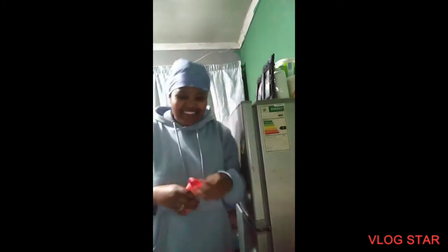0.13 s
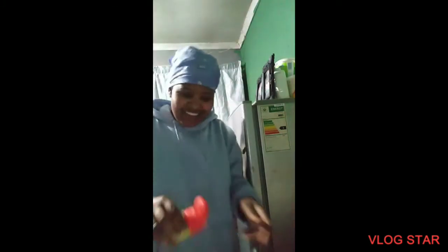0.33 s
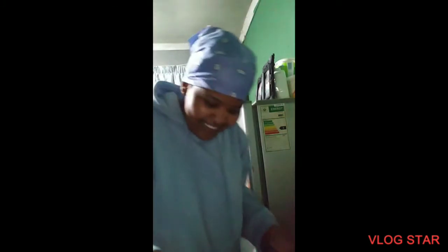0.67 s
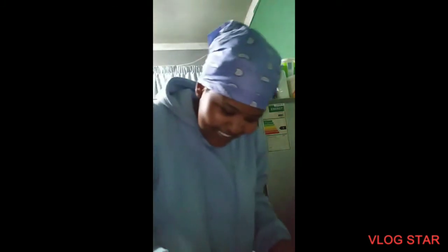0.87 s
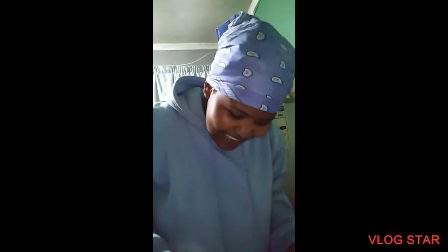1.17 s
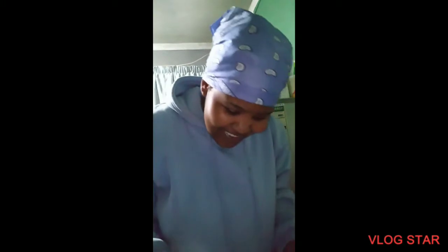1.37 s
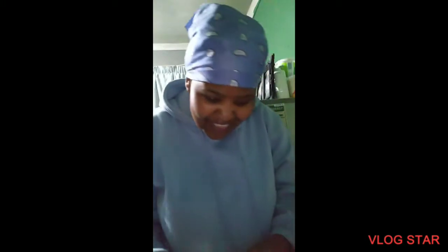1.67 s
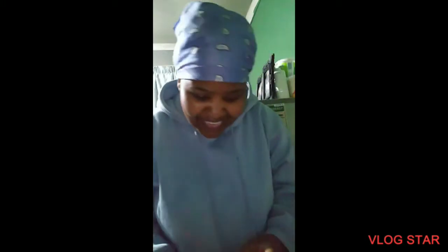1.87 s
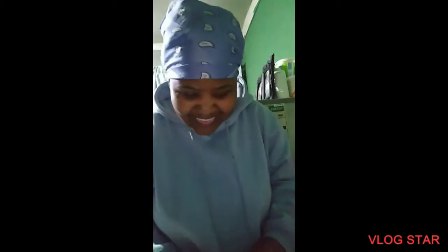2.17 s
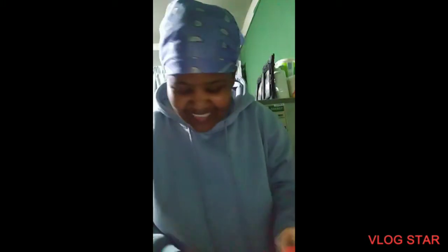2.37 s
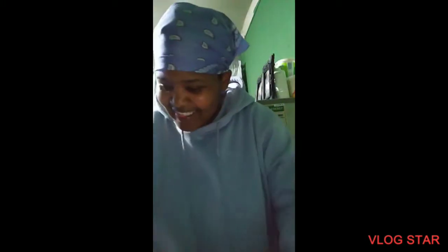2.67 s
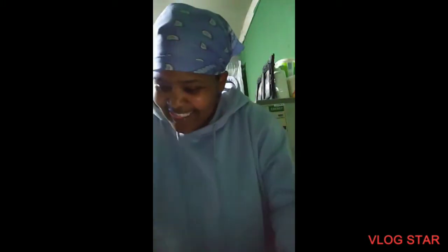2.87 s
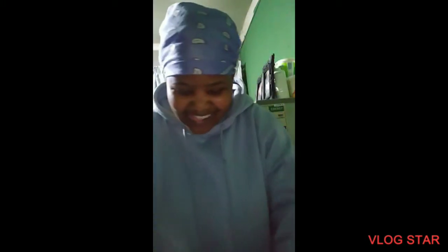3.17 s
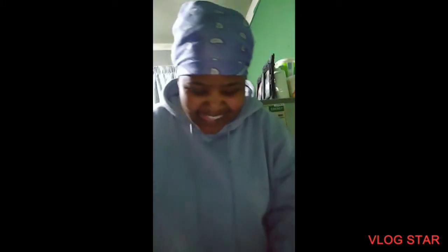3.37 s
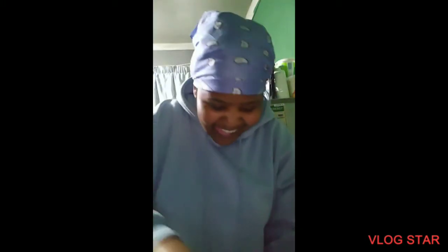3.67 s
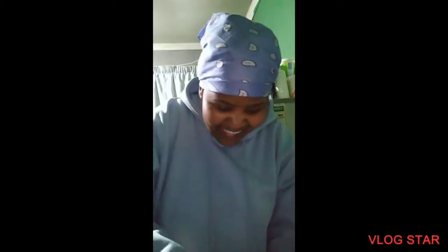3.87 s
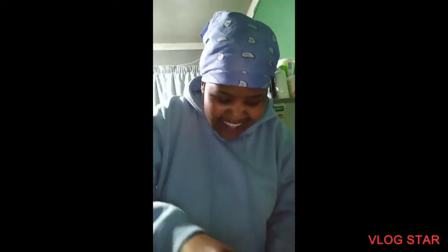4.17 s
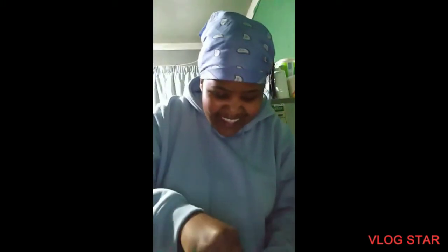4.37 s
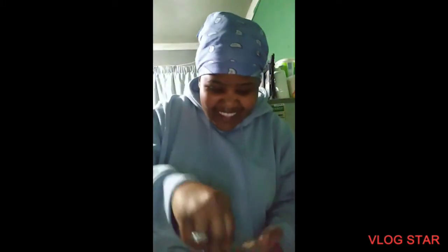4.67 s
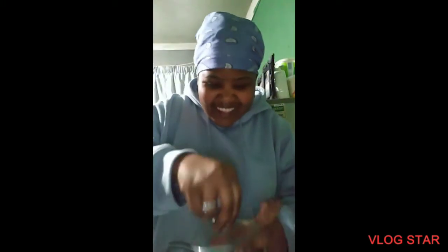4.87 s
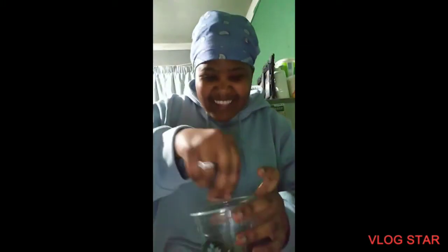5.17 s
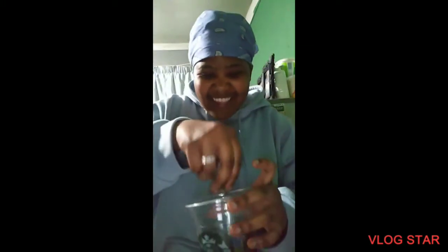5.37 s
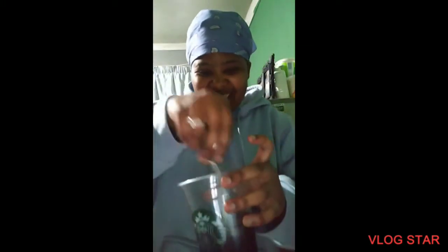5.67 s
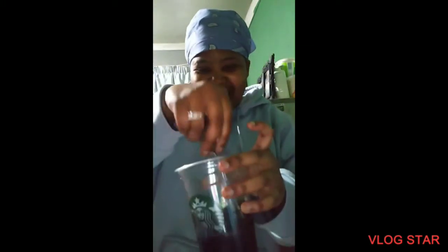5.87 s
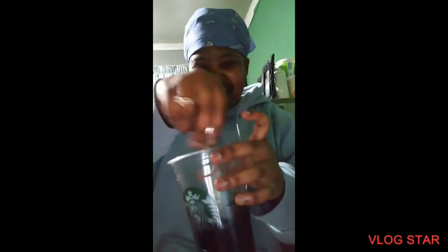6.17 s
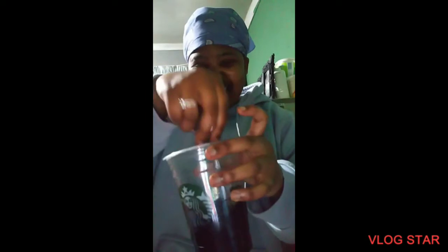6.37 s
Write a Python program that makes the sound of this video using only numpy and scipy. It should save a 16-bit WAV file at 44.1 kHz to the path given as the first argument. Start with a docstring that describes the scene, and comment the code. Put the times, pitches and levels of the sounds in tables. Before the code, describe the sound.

Brief crackly rustling of a packet and light sliding lead to two sharp knocks as things land on a kitchen counter. After a short lull, a spoon starts circling in a thin plastic cup, with quick, uneven taps and scrapes that seem to come nearer. The nearby microphones give a crisp stereo sound, with little echo and only faint room noise behind it.

```python
"""In a small kitchen, hands crumple a packet, slide things over the counter and set two down hard.
Then a spoon stirs a drink in a thin plastic cup, scraping and clattering on its wall, ever closer.
Rubbing is thousands of tiny slips; a hit is a burst of noise plus the ringing of the thing struck.
Two spaced microphones with bright treble pick it up over a faint fridge hum and background noise."""
import sys
import numpy as np
from scipy import signal
from scipy.fft import rfft, irfft, next_fast_len
from scipy.io import wavfile
from scipy.ndimage import uniform_filter1d

SR = 44100
rng = np.random.default_rng(int(sys.argv[2]) if len(sys.argv) > 2 else 0)


def materialize(psi):
    """Save the field psi as 16-bit PCM at rate SR to the path in sys.argv[1].

    A 1-D psi becomes a single channel; in a 2-D psi each row is a channel.
    """
    bounded = np.clip(np.atleast_2d(psi).T, -1, 1)
    quanta = np.round(bounded * 32767).astype(np.int16)
    wavfile.write(sys.argv[1], SR, quanta)


N = 287091

# Rustles, slides and the hiss that trails a knock.
# A rise or fall spans 30 dB; "middle" is the hiss below the treble.
# (peak time [s], rise [s], fall [s], hiss [dB], ringing [dB], middle against treble [dB])
HANDLING = [(0.0, .01, 0.31, -42.5, -45, -5), (.256, 0.04, 0.095, -45, -70, -10.5),
            (.385, 0.032, 0.12, -35.5, -45, -14), (.47, 0.15, 0.25, -54.5, -56, -5.5),
            (.63, 0.14, 0.21, -40, -76, -15.5), (.72, 0.11, 0.27, -32.5, -80, -12),
            (.817, 0.049, 0.095, -37, -39, -16), (.927, 0.17, 0.074, -36.5, -49, -14),
            (1.035, 0.19, 0.13, -39, -58, -19.5), (1.275, 0.0058, .13, -50.5, -79, -8),
            (1.6, 0.059, 0.16, -59.5, -78.5, -30), (1.68, 0.17, 0.18, -35, -92, -35),
            (1.75, 0.22, .11, -41.5, -82.5, -16.5), (2.13, 0.044, 0.083, -23, -37, -13),
            (2.2, .05, 0.2, -48, -53, -11.5), (2.37, 0.018, 0.17, -49.5, -85, -25.5),
            (2.41, 0.066, 0.037, -43, -81, -23.5), (2.574, 0.15, 0.4, -51.5, -78.5, -23),
            (2.73, 0.053, 0.41, -54.5, -88, -28), (2.94, 0.095, 0.11, -50, -61.5, -9.5),
            (3.0, 0.042, .2, -50.5, -35.5, 0.5), (3.1, 0.17, 0.25, -57, -36.5, 0),
            (3.202, 0.12, 0.24, -51, -48, -4.5), (3.81, 0.022, .2, -52.5, -85.5, -16),
            (3.855, 0.087, 0.084, -56, -66, -18.5)]
# Creases snapping. A fade is the time to die away by 60 dB.
# (time [s], treble crack [dB], middle crack [dB], ringing [dB], pitch [Hz], crack fade [s])
SNAPS = [(.2522, -43, -53, -58, 203, 0.073), (.3514, -68, -51, -39.5, 353, .038),
         (.3706, -37.5, -65, -31.5, 640, 0.24), (.428, -36, -62, -30, 382, 0.015),
         (.5885, -52, -43, -63, 960, 0.027), (.6085, -24, -33, -47.5, 810, 0.035),
         (.618, -9.5, -28, -43, 810, 0.012), (.697, -45, -34, -40, 875, 0.015),
         (.7106, -17, -31.5, -36, 884, 0.04), (.7975, -50, -43, -55, 286, .032),
         (.9134, -23, -46, -39, 486, 0.055), (.9198, -41, -31, -26.5, 560, 0.029),
         (1.278, -50.5, -55, -49, 916, 0.061), (1.604, -30, -50, -70, 1280, 0.037),
         (1.9164, -58, -65, -55.5, 300, 0.061), (2.2385, -38.5, -73.5, -51, 323, 0.03),
         (2.365, -46.5, -63, -44, 199.6, .061), (2.4114, -42.5, -73, -53.5, 237.7, .022),
         (3.8066, -49, -57.5, -52, 830, .065), (3.8631, -36, -86.5, -45.5, 560, 0.017)]
# The tones the packet rings with: (pitch [Hz], level [dB], fade [s])
PACKET_TONES = [(167, -4.5, 0.02), (324, 0, 0.037), (560, 0, 0.022), (810, 5.5, 0.022), (1760, 2, 0.011),
                (2220, -24, 0.01)]
# The tone colour of its hiss: (frequency [Hz], level [dB])
RUSTLE_COLOUR = [(710, -53.5), (1200, -20), (1280, -23), (1580, -20.5), (2390, -13.5), (3900, -7),
                 (4430, -4.5), (5310, -2.5), (6500, 6.5), (7540, 2.5), (10200, -10), (14000, -20),
                 (14600, -35.5), (15200, -84)]

def packet_and_handling():
    """Surfaces catch and slip in rustles and slides, hiss trails a knock, and the packet's creases snap."""
    handling = rub(HANDLING, RUSTLE_COLOUR, PACKET_TONES, slips_per_s=8700, spread_db=2,
                   unshared=0.87, patch_gain=0.34, steepness=1.3)
    snaps = hits(SNAPS, RUSTLE_COLOUR, PACKET_TONES, rise_s=0.001, pan_db=4, upper_db=-16, octave_db=24.5)
    return handling + snaps

# Strokes of the spoon round the cup:
# (peak time [s], rise [s], fall [s], hiss [dB], ringing [dB], middle against treble [dB])
STROKES = [(3.99, 0.013, 0.043, -47.5, -78.5, -11), (4.085, 0.026, 0.11, -37, -37, -9),
           (4.175, 0.13, 0.16, -47, -46, -9.5), (4.311, 0.14, 0.011, -45.5, -52.5, -13),
           (4.36, 0.035, 0.084, -38, -42.5, -9), (4.49, 0.035, 0.093, -41.5, -51, -10),
           (4.53, .03, 0.17, -59, -71, -5), (4.648, 0.031, 0.11, -48.5, -61, -3.5),
           (4.73, 0.0074, .1, -47.5, -42.5, -3), (4.77, .05, 0.26, -70, -63, -10),
           (4.88, 0.027, 0.23, -55, -74, -2), (4.966, 0.1, 0.11, -42.5, -46, -8.5),
           (5.036, 0.0061, 0.12, -47.5, -56, -10), (5.147, .05, 0.044, -42.5, -58, -7),
           (5.171, 0.0082, 0.44, -44, -46.5, -8), (5.388, 0.067, 0.16, -36.5, -42.5, -13),
           (5.452, 0.039, .14, -34, -57, -9.5), (5.55, 0.16, 0.28, -63.5, -47, 4),
           (5.615, 0.022, 0.25, -38.5, -45.5, -10), (5.711, 0.12, 0.079, -35.5, -66, -14.5),
           (5.817, 0.069, 0.092, -42.5, -59, -15), (5.85, 0.031, 0.22, -54.5, -41, 4.5),
           (5.951, 0.17, 0.063, -42, -66, -15), (6.005, 0.066, 0.033, -41, -38, -22),
           (6.125, 0.028, 0.19, -31, -29.5, -9.5), (6.22, .1, 0.9, -44, -52, -13),
           (6.375, 0.039, 0.023, -36, -25, -19), (6.421, 0.014, 0.12, -49, -34, -16),
           (6.475, 0.024, 0.04, -28.5, -41, 0.5)]
# The spoon striking the cup:
# (time [s], treble crack [dB], middle crack [dB], ringing [dB], pitch [Hz], crack fade [s])
CLATTERS = [(3.9899, -34.5, -68.5, -68.5, 953, 0.014), (4.0617, -34, -41, -44, 784, 0.093),
            (4.1625, -47, -43.5, -44, 774, 0.083), (4.3374, -28.5, -29, -43, 740.3, 0.014),
            (4.4774, -36, -39, -48, 2480, 0.011), (4.4862, -28, -31, -31, 2070, .051),
            (4.6337, -58, -49.5, -53.5, 816, 0.039), (4.6498, -34, -43, -47, 840, 0.011),
            (4.7292, -41, -42.5, -45.5, 926, 0.021), (4.8312, -46.5, -56, -66.5, 886, 0.033),
            (4.8658, -24.5, -37.5, -47, 736, 0.023), (4.8953, -35.5, -44, -46, 940, 0.09),
            (4.9244, -40, -67, -51, 910, 0.04), (4.9679, -31, -36, -47, 868, 0.025),
            (5.038, -41, -82, -62.5, 390, 0.038), (5.0789, -42.5, -51, -65, 785, 0.029),
            (5.1096, -30, -39, -43, 816, 0.047), (5.1402, -40, -54, -49, 2280, .025),
            (5.17, -31, -51, -43, 946, 0.038), (5.2051, -32.5, -46, -51, 831, 0.068),
            (5.2164, -39, -39, -47, 785, 0.016), (5.3193, -18, -27.5, -40.5, 1700, 0.0067),
            (5.3468, -23, -34, -38.5, 760, 0.02), (5.3891, -24.5, -62, -67, 333, 0.023),
            (5.435, -44, -41.5, -45, 795, 0.061), (5.4555, -24, -32, -40, 588, 0.025),
            (5.463, -24.5, -52, -58, 680, 0.021), (5.522, -40, -45, -51, 1070, 0.053),
            (5.5392, -23.5, -29, -48, 1594, 0.0081), (5.564, -38, -44, -63, 790, 0.032),
            (5.6, -22, -41, -44, 735, 0.03), (5.7084, -27.5, -26.5, -31.5, 1053, 0.069),
            (5.7164, -55, -28, -39, 2100, 0.07), (5.7234, -42, -45, -25.5, 2050, 0.011),
            (5.8202, -28.5, -32, -65, 1780, 0.024), (5.8491, -31, -40, -43.5, 322, 0.028),
            (5.88, -35, -46, -50, 369, 0.037), (5.9, -37, -72, -55, 255, 0.11),
            (5.9523, -29, -58, -69, 1110, .02), (5.962, -37, -42, -55, 787, 0.0093),
            (5.9864, -9, -21.5, -29.5, 1780, 0.013), (6.1027, -22, -29.5, -39, 784, 0.026),
            (6.1245, -34, -45, -67, 744, 0.021), (6.1622, -24, -38, -51, 850, 0.023),
            (6.195, -25, -37, -35, 1920, 0.077), (6.2104, -29, -52, -55, 2170, 0.016),
            (6.328, -21.5, -35.5, -64, 2070, 0.017), (6.3575, -19, -29, -44, 780, 0.032),
            (6.4223, -25.5, -26.5, -33, 628, 0.033), (6.4591, -11.5, -19, -37, 1103, 0.02),
            (6.477, -28, -24, -42, 1700, .025), (6.4945, -24, -46, -37.5, 276, 0.031)]
# The tones of the cup's wall: (pitch [Hz], level [dB], fade [s])
CUP_TONES = [(180, 5, 0.011), (301.7, 13, 0.035), (380, 12, 0.035), (547.4, 0.5, 0.087), (681, 9.5, 0.052),
             (798.7, 15, 0.057), (879.5, 11, 0.064), (1023.6, 16.5, 0.025), (1177, 6.5, 0.03),
             (1700, -4.5, 0.036), (2070, -19, 0.084), (2160, -22, 0.025), (3092, -8, 0.031),
             (4690, -6, 0.025), (6200, -5, 0.021)]
# The tone colour of the scraping: (frequency [Hz], level [dB])
SCRAPE_COLOUR = [(560, -28), (950, -4.5), (1030, -2.5), (1270, -6.5), (2120, 0), (2580, -7), (2960, -1),
                 (3870, -5), (6750, 3), (8920, -7), (10400, -24.5), (13700, -30.5), (15200, -48.5)]

def spoon_in_cup():
    """The spoon scrapes and taps the thin plastic wall, which rings briefly."""
    scrape = rub(STROKES, SCRAPE_COLOUR, CUP_TONES, slips_per_s=14000, spread_db=5.5,
                 unshared=1, patch_gain=0.32, steepness=1.32)
    taps = hits(CLATTERS, SCRAPE_COLOUR, CUP_TONES, rise_s=0.001, pan_db=12, upper_db=5.5, octave_db=12.5)
    return scrape + taps

# Things landing on the counter:
# (time [s], treble crack [dB], middle crack [dB], ringing [dB], pitch [Hz], crack fade [s])
KNOCKS = [(.0014, -47, -46, -30.5, 379, 0.091), (2.0986, -2, -15, -9.5, 274.6, 0.069),
          (2.4744, -81, -80, -61, 272, 0.036), (2.7054, -54.5, -44.5, -49, 314, 0.019),
          (2.8724, -58, -65, -43.5, 480, 0.052), (2.9512, -28, -11.5, -8, 541.3, 0.047),
          (2.9621, -33.5, -21.5, -9, 526, 0.095), (3.0862, -50, -46, -22.5, 389, 0.044),
          (3.1193, -43, -36, -29, 830, 0.061), (3.19, -36.5, -30.5, -25.5, 1390, 0.076),
          (3.1996, -37, -36, -25, 1160, 0.09)]
# The counter's tones: (pitch [Hz], level [dB], fade [s])
COUNTER_TONES = [(112.5, -1, 0.15), (170, -17.5, 0.25), (276.5, 3.5, 0.049), (376, -9.5, 0.18),
                 (544, -4.5, 0.072), (660, -8, 0.069), (782, 3, 0.03), (970, -2, 0.017), (1051, 7, 0.017),
                 (1230, 4.5, 0.03), (1487, -1.5, 0.037), (1780, -7.5, 0.14), (2095, -13, .03),
                 (2400, -18.5, 0.028)]
# The tone colour of a knock's crack: (frequency [Hz], level [dB])
CRACK_COLOUR = [(700, -30), (1300, -17.5), (2300, -11), (3400, -15.5), (4600, -5.5), (6600, 3.5),
                (8000, -3), (10400, -18), (14000, -28.5), (15200, -50.5)]

def counter_knocks():
    """A thing set down makes a sharp crack and sets the counter ringing."""
    return hits(KNOCKS, CRACK_COLOUR, COUNTER_TONES, rise_s=0.0014, pan_db=4.5, upper_db=5.5, octave_db=10)

# Soft thuds through the counter: (peak time [s], rise [s], fall [s], level [dB])
THUDS = [(0.0, .01, 0.19, -36), (.9, .4, 0.27, -76), (2.105, 0.031, 0.32, -45), (2.96, 0.02, 0.34, -37.5),
         (3.12, 0.075, 0.24, -50), (3.85, 0.22, .8, -78), (4.75, .15, 0.51, -60.5), (4.92, .3, 0.35, -62.5),
         (5.42, .5, 0.37, -69), (5.89, 0.14, .3, -72), (6.15, 0.12, .2, -55), (6.45, 0.18, .2, -50)]

def counter_thuds():
    """Lumpy noise swells in one low tone of the counter."""
    rumble = rms_one(ring(rng.standard_normal(N), hz=103, fade_s=0.07))
    return loudness(swells(THUDS), np.transpose(THUDS)[3]) * rumble

def kitchen_echo(x, fade_s=0.19, dull_hz=2300):
    """Sound bounces between the walls along eight paths a side, duller on every round."""
    size = next_fast_len(N + SR)
    hz = np.arange(size // 2 + 1) * SR / size
    dull = 1 / (1 + 1j * hz / dull_hz) ** 0.1
    sides = []
    for delays_s in rng.uniform(0.0053, 0.02, (2, 8)) * SR // 1 / SR:
        trips = [from_db(-60 * s / fade_s) * dull * np.exp(-2j * np.pi * hz * s) for s in delays_s]
        walls = sum(trip / (1 - trip) * (-1) ** k for k, trip in enumerate(trips))
        sides.append(irfft(rfft(x, size) * walls, size)[:N])
    return np.array(sides)

def fridge_hum(hz=100, wander_hz=3):
    """A mains hum that wavers a little."""
    wander = np.cumsum(rng.standard_normal(N)) * np.sqrt(2 * np.pi * wander_hz / SR)
    phase = 2 * np.pi * hz * np.arange(N) / SR + uniform_filter1d(wander, 2000)
    return from_db(-83) * np.sqrt(2) * np.sin(phase)

# Background noise over time: (peak time [s], rise [s], fall [s], then the level of each band [dB])
BACKGROUND_LEVELS = [(.76, 0.11, 0.22, -79.5, -45, -75, -60), (1.098, 0.25, 0.21, -73, -85.5, -97, -60.5),
                     (1.72, 0.098, 0.24, -83, -64, -80, -85), (1.82, .3, 0.037, -74.5, -71, -88.5, -64.5),
                     (1.95, 0.22, 0.42, -70, -92.5, -93.5, -67.5),
                     (2.74, .05, 0.58, -67.5, -85.5, -67, -65), (3.45, .12, .2, -60.5, -85, -65.5, -86),
                     (3.57, 0.036, 0.082, -62, -93, -82.5, -95), (3.62, 0.042, 0.38, -68.5, -93, -81, -98),
                     (4.6, 0.55, 1.6, -80, -82.5, -90.5, -65), (5.5, 1, 1.2, -62.5, -76, -75, -75)]
# Its four bands: (pitch [Hz], fade [s])
BACKGROUND_BANDS = [(310, .02), (760, .015), (1600, .008), (1900, .006)]

def background_bands():
    """Faint narrow bands of background noise fade in and out."""
    noise = rng.standard_normal((2, N))
    bands = [rms_one(ring(ring(noise, hz, fade), hz, fade)) for hz, fade in BACKGROUND_BANDS]
    levels_db = np.transpose(BACKGROUND_LEVELS)[3:]
    return sum(loudness(swells(BACKGROUND_LEVELS), db) * band for db, band in zip(levels_db, bands))

# The tone colour of the quiet room: (frequency [Hz], level [dB])
AIR_COLOUR = [(15, -55.5), (25, -18.5), (231, -21), (318, -13), (415, -41), (1460, -49.5), (1630, -20.5),
              (1860, -51.5), (2630, -32.5), (2850, -49), (5140, -36.5), (6370, -25.5), (15000, -35.5)]

def room_air():
    """Each microphone hears a faint, steady noise of its own."""
    return from_db(-81.5) * np.array([coloured(noise, AIR_COLOUR) for noise in rng.standard_normal((2, N))])

def rub(rows, colour, tones, slips_per_s, spread_db, unshared, patch_gain, steepness):
    """Many tiny slips hiss; fewer make the object ring. Steepness sharpens the ringing's swells."""
    swell_db = swells(rows)
    hiss_db, ringing_db, middle_db = np.transpose(rows)[3:]
    shared = grit(slips_per_s, spread_db)
    own = np.array([grit(slips_per_s, spread_db) for microphone in range(2)])
    slips = np.sqrt(1 - unshared) * shared + np.sqrt(unshared) * own
    slips += patch_gain * surface_patches(slips)
    middle, treble = middle_and_treble(np.array([coloured(side, colour) for side in slips]))
    hiss = loudness(swell_db, hiss_db) * treble + loudness(swell_db, hiss_db + middle_db) * middle
    pushes = grit(slips_per_s / 11, spread_db)
    ringing = sum(from_db(db) * ring(pushes, hz, fade) * (-1) ** k for k, (hz, db, fade) in enumerate(tones))
    return panned(hiss, pan_db=4) + loudness(steepness * swell_db, ringing_db) * rms_one(ringing)

def grit(per_s, spread_db):
    """Random slips of uneven size, as when two surfaces catch and let go."""
    sizes = from_db(spread_db * np.minimum(rng.exponential(1, N), 5)) * rng.choice([-1, 1], N)
    return rms_one(sizes * (rng.random(N) < per_s / SR))

def surface_patches(slips, cycles=40):
    """Slips ring one small patch of the surface at a time, each at its own pitch."""
    pitches = np.geomspace(1300, 13000, 14)
    touched = rng.integers(0, len(pitches), N // 256 + 1).repeat(256)[:N]  # picked about every 6 ms
    return rms_one(sum(hz * ring(slips * (touched == k), hz, cycles / hz) for k, hz in enumerate(pitches)))

def hits(rows, colour, tones, rise_s, pan_db, upper_db, octave_db):
    """Each hit is a burst of noise plus ringing tones, weaker by octave_db per octave from its pitch."""
    treble_gain, middle_gain, ringing = np.zeros((3, 2, N))
    age = np.arange(SR // 7) / SR
    onset = 1 - np.exp(-(age / rise_s) ** 2)
    tick = 1 + 0.78 * np.exp(-age / 0.00068)  # the sharp first contact
    tone_hz, tone_db, tone_fade = np.transpose(tones)[:, :, None]
    chances = rng.normal(0, 1, (len(rows), 3, len(tones), 1))
    for (time, treble_db, middle_db, ringing_db, hz, fade), (luck, bend, lean) in zip(rows, chances):
        start = round(time * SR)
        span = slice(start, start + len(age))
        burst = panned(from_db(-60 * age / fade) * onset * tick, pan_db)[:, :N - start]
        treble_gain[:, span] += from_db(treble_db) * burst
        middle_gain[:, span] += from_db(middle_db) * burst
        # grip and load shift the tones, so that the nearest lands on the hit's pitch
        octaves = np.log2(tone_hz / hz)
        distance = abs(octaves)
        detune = 0.077 * bend * np.minimum(9 * distance, 1)
        pitch = tone_hz * 2 ** (detune - octaves[np.argmin(distance)])
        upper = from_db(middle_db + upper_db) * (tone_hz > 1300)  # high tones follow the crack
        strength = from_db(ringing_db - octave_db * distance) + upper
        heights = strength * from_db(tone_db + 3 * luck - 60 * age / tone_fade) * onset
        for side, turn in enumerate((-0.15, 0.15)):  # tones meet the two microphones out of step
            waves = np.sin(2 * np.pi * pitch * age + 2.8 * luck + turn * lean)
            ringing[side, span] += np.sum(heights * waves, axis=0)[:N - start]
    middle, treble = middle_and_treble(coloured(rng.standard_normal(N), colour))
    return treble_gain * treble + middle_gain * middle + ringing

def swells(rows):
    """Each row's level in dB, every 32 samples: a rounded climb to its peak, then a straight fall."""
    peak, rise, fall = np.transpose(rows)[:3, :, None]
    late = np.arange(0, N + 32, 32) / SR - peak
    return -30 * np.where(late < 0, (abs(late) / rise) ** 1.8, late / fall)

def loudness(swell_db, level_db):
    """Adds the power of the swells into one gain per sample."""
    power = np.sum(from_db(swell_db + level_db[:, None]) ** 2, axis=0)
    return np.interp(np.arange(N) / 32, np.arange(len(power)), np.sqrt(power))

def ring(x, hz, fade_s):
    """Every click in x starts a dying tone."""
    decay, step = from_db(-60 / (fade_s * SR)), 2 * np.pi * hz / SR
    return signal.lfilter([0, np.sin(step)], [1, -2 * decay * np.cos(step), decay ** 2], x + 1e-18)

def coloured(x, colour):
    """Gives x a tone colour while keeping its clicks sharp (a minimum-phase filter)."""
    hz, db = np.transpose(colour)
    grid_hz = np.maximum(np.arange(4097) * SR / 8192, 1)
    gains = from_db(np.interp(np.log(grid_hz), np.log(hz), db))
    cepstrum = irfft(np.log(gains))
    cepstrum[1:4096] *= 2  # folding moves the energy to the start of the pulse
    cepstrum[4097:] = 0
    pulse = irfft(np.exp(rfft(cepstrum)))[:4096]
    return signal.fftconvolve(x, pulse / np.sqrt(np.sum(pulse ** 2)))[:N]

def middle_and_treble(x):
    """Splits x into a lower and an upper part of equal strength."""
    middle = signal.sosfilt(signal.butter(7, 2470, fs=SR, output="sos"), x)
    treble = signal.sosfilt(signal.butter(3, 3290, "high", fs=SR, output="sos"), x)
    return rms_one(middle), -rms_one(treble)  # flipped, so the parts add where they meet

def panned(x, pan_db):
    """Makes the left side louder than the right by pan_db."""
    return x * from_db([[pan_db / 2], [-pan_db / 2]])

def left_first(x, lead_s):
    """The sound reaches the right microphone later."""
    lag = round(lead_s * SR)
    return np.array([x[0], np.pad(x[1], (lag, 0))[:N]])

def from_db(db):
    """Turns decibels into a gain."""
    return 10 ** (np.asarray(db) / 20)

def rms_one(x):
    """Scales x to an average strength (rms) of 1."""
    return x / np.sqrt(np.mean(x ** 2) + 1e-20)

def scene():
    """Packet, spoon and knocks reach the left microphone first, then fill the kitchen."""
    near = left_first(packet_and_handling() + spoon_in_cup(), lead_s=0.0004)
    near += left_first(counter_knocks(), lead_s=0.00024)
    echo = from_db(-20.5) * kitchen_echo(near.mean(axis=0))
    return near + echo + counter_thuds() + fridge_hum() + background_bands() + room_air()

def record(dry, bass_hz=85, top_hz=15370):
    """The microphones drop the deep bass, clip any peak that is too loud and cut the highest treble."""
    thin = signal.sosfilt(signal.butter(2, bass_hz, "high", fs=SR, output="sos"), dry)
    return signal.sosfilt(signal.cheby2(16, 100, top_hz, fs=SR, output="sos"), np.clip(thin, -1, 1))

dry = scene()
out = record(dry)
materialize(out)
```